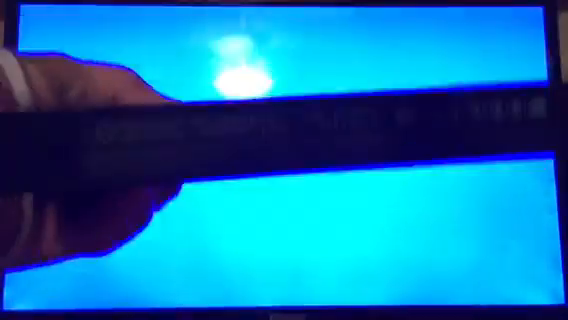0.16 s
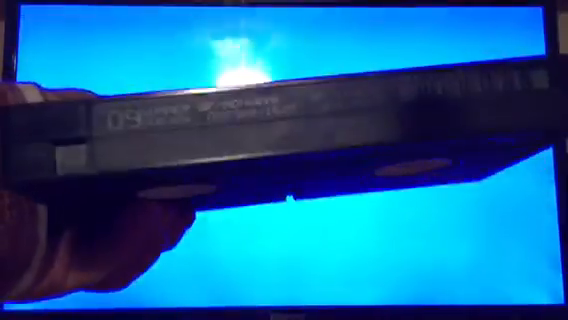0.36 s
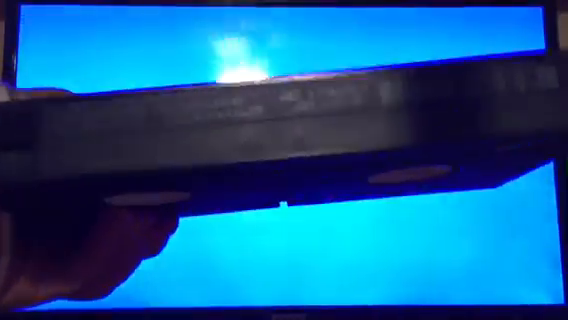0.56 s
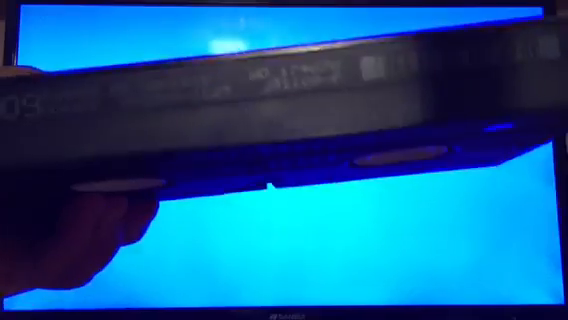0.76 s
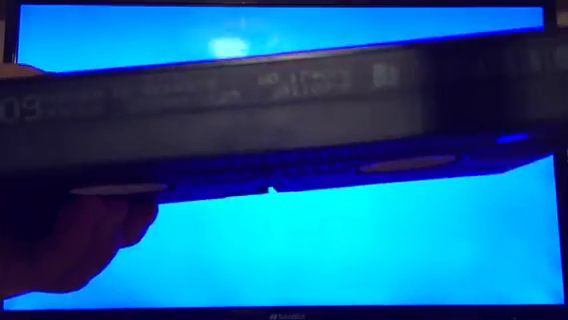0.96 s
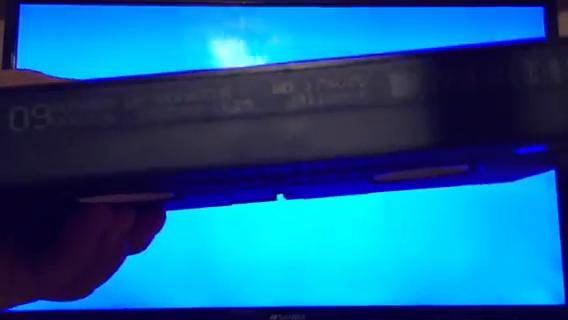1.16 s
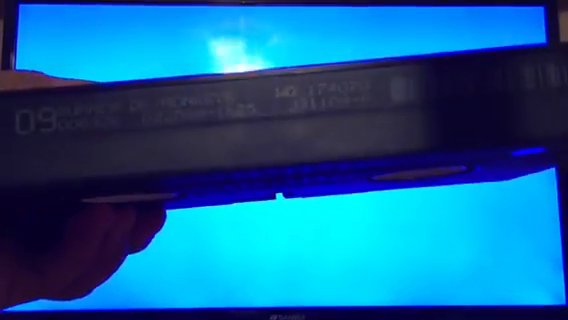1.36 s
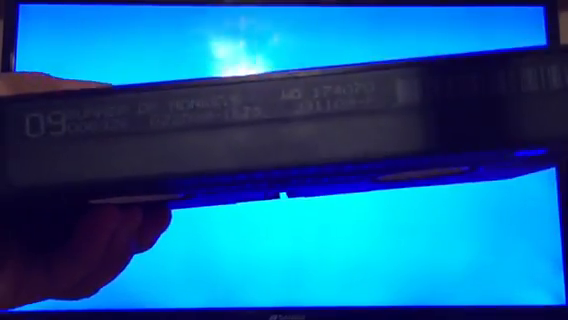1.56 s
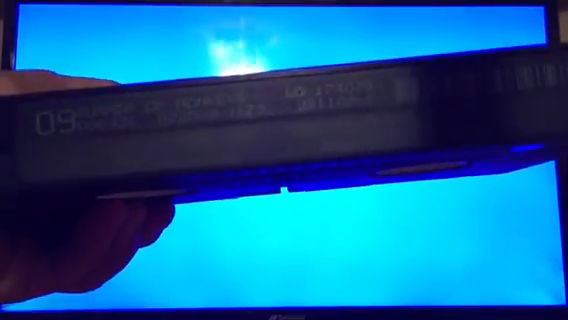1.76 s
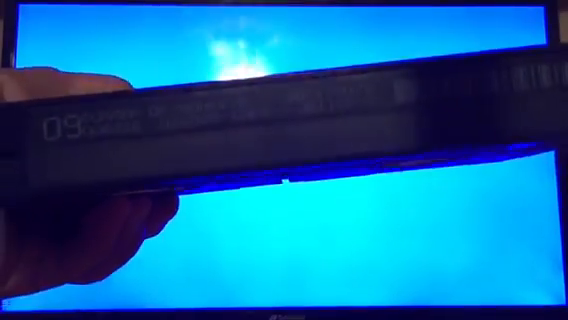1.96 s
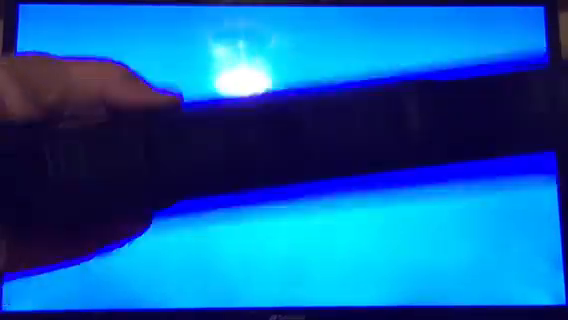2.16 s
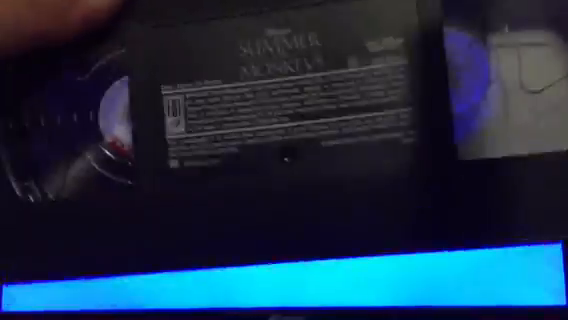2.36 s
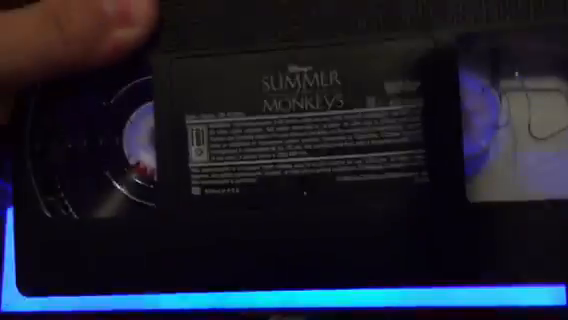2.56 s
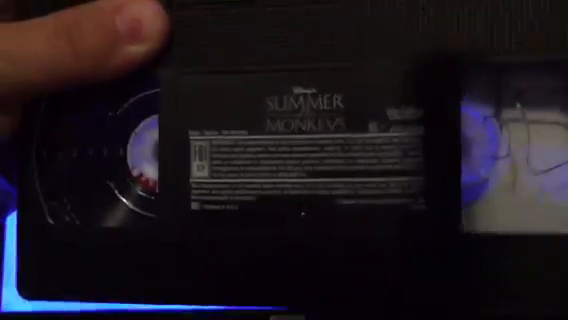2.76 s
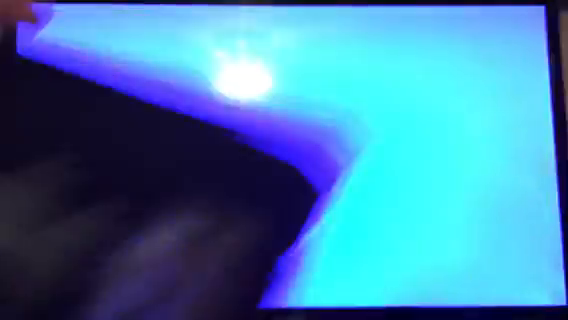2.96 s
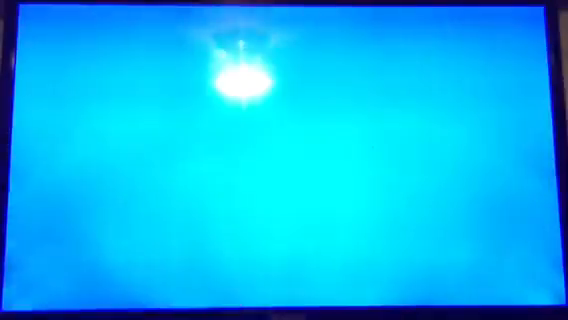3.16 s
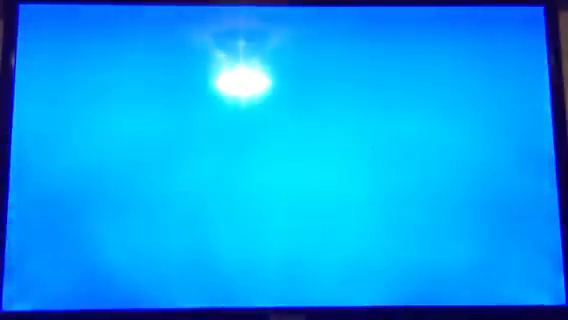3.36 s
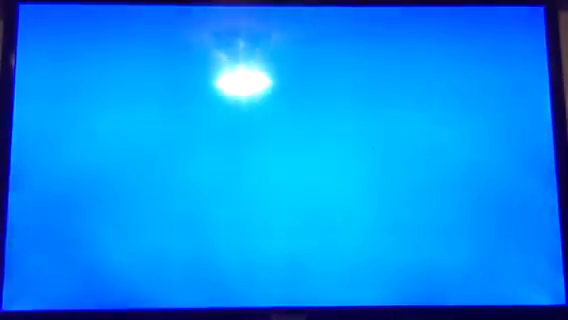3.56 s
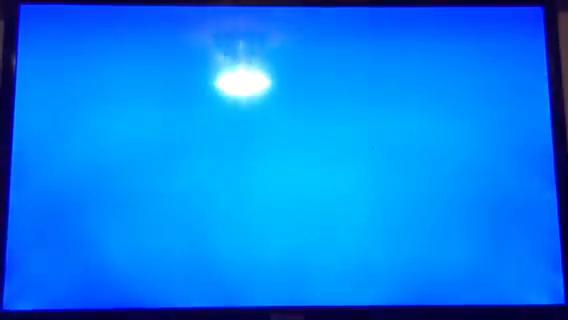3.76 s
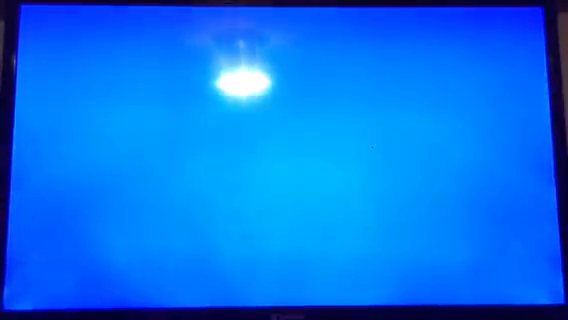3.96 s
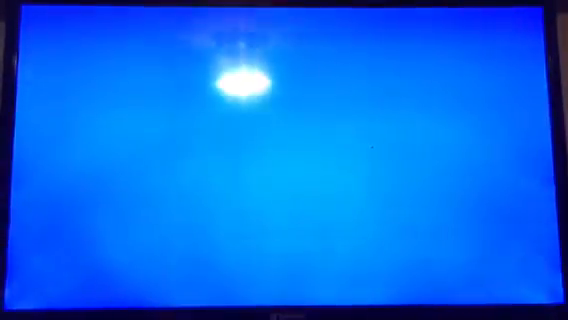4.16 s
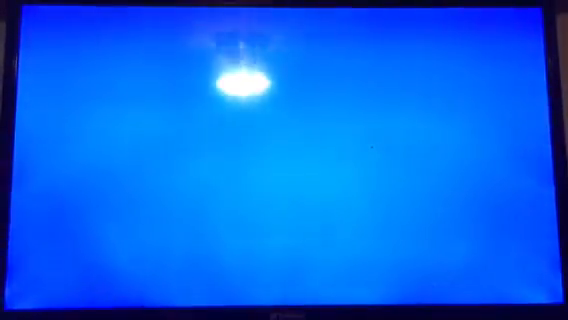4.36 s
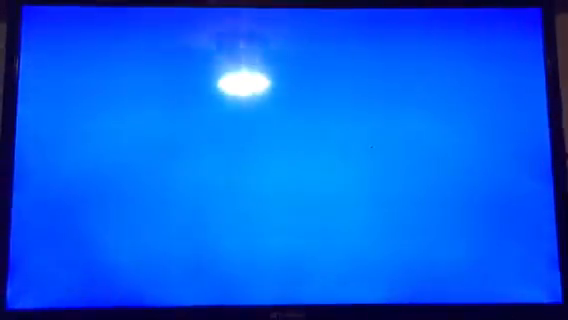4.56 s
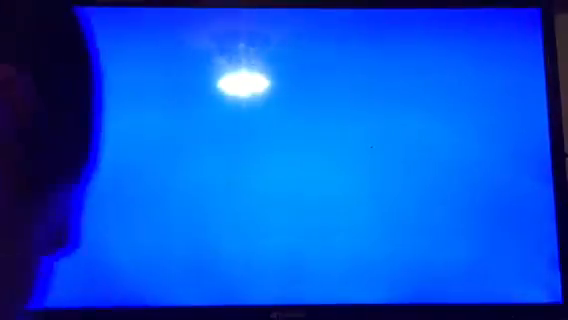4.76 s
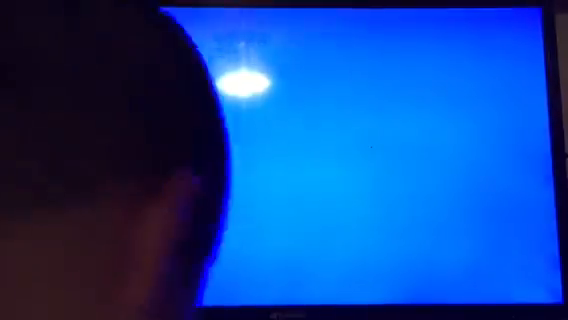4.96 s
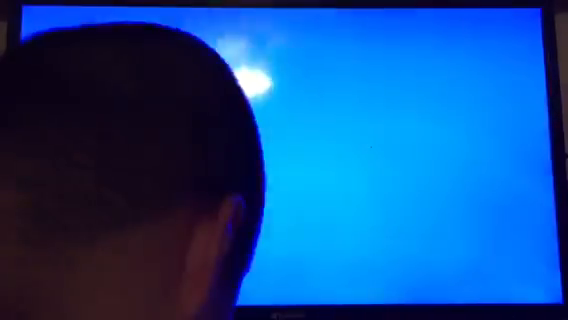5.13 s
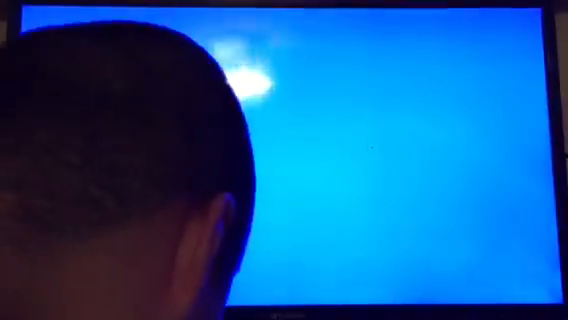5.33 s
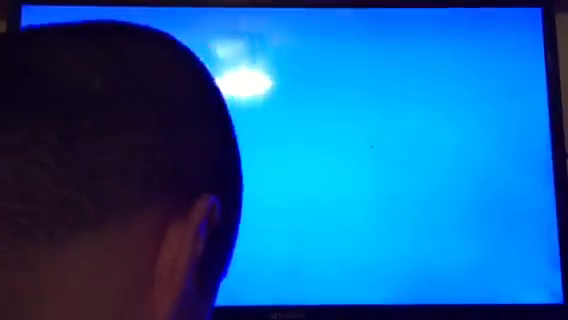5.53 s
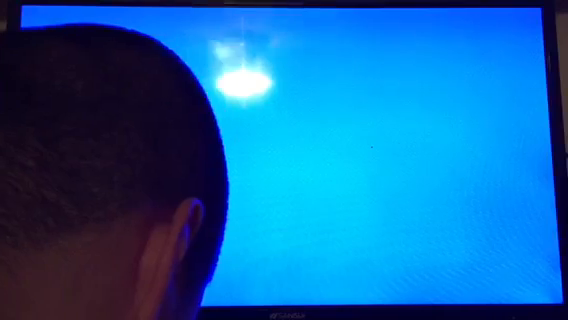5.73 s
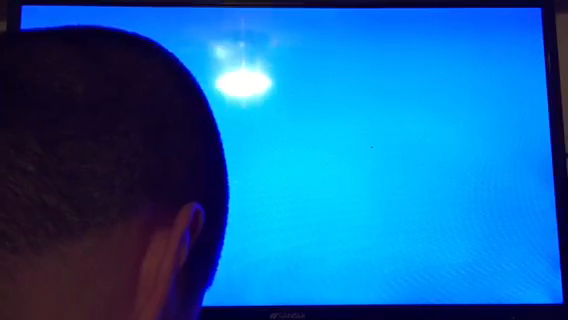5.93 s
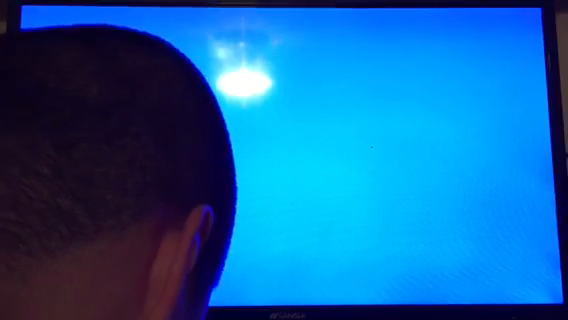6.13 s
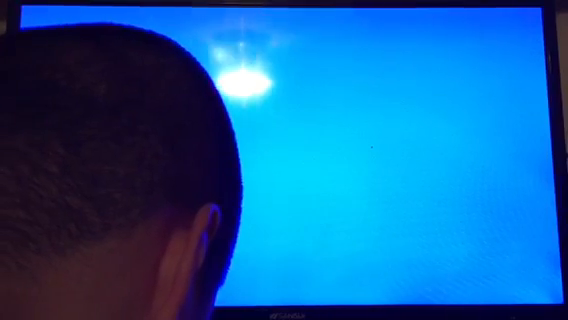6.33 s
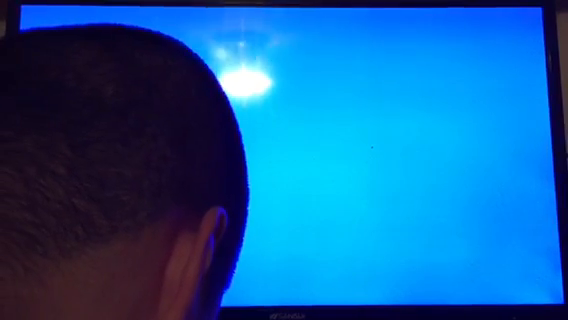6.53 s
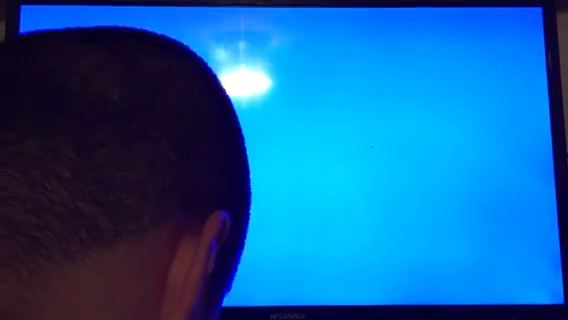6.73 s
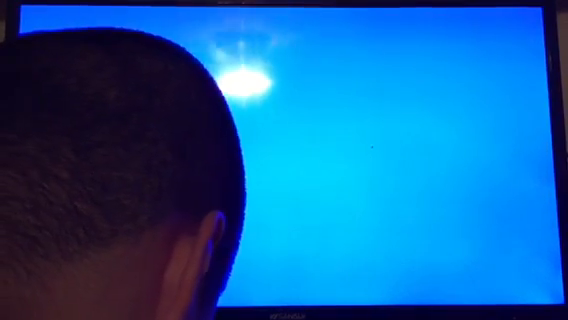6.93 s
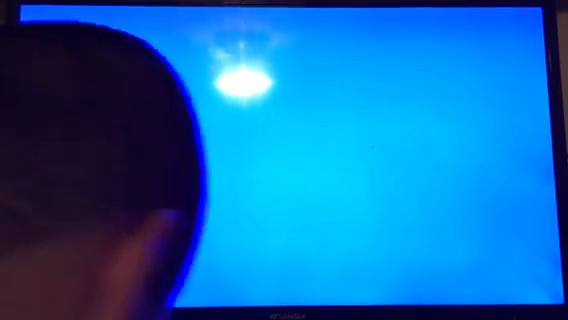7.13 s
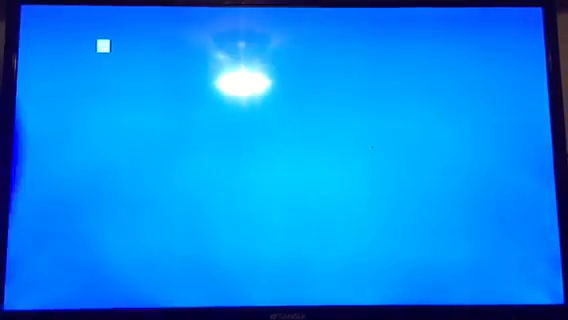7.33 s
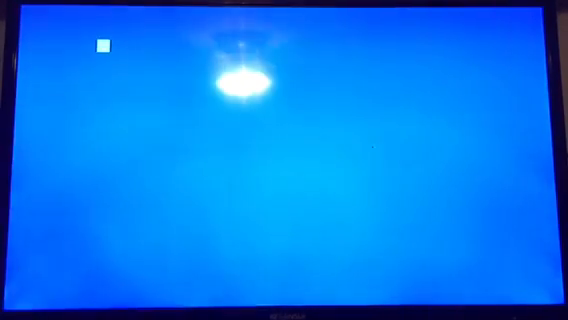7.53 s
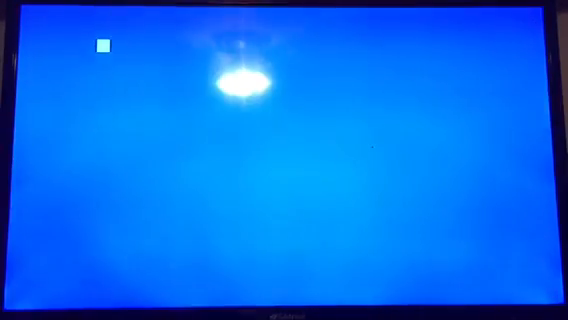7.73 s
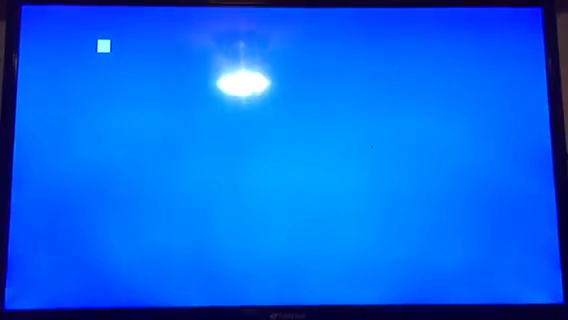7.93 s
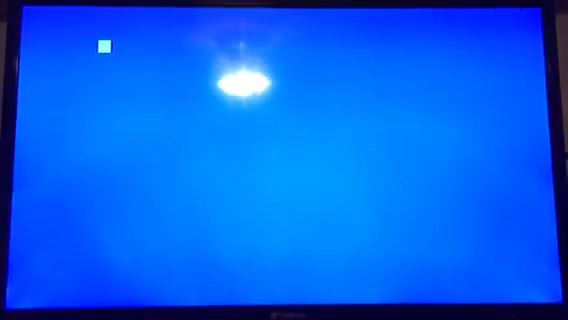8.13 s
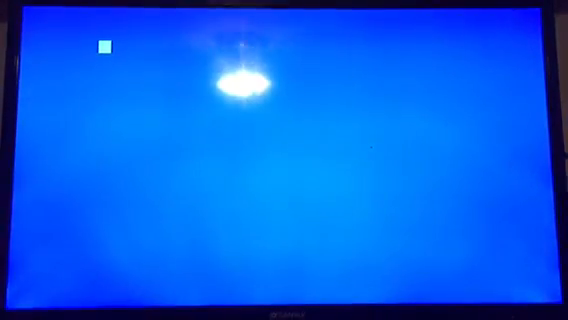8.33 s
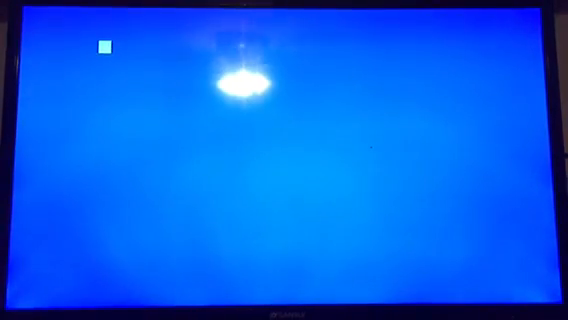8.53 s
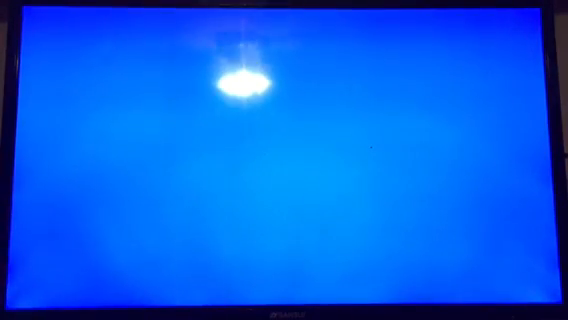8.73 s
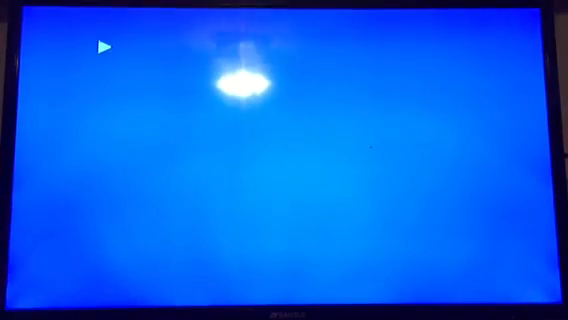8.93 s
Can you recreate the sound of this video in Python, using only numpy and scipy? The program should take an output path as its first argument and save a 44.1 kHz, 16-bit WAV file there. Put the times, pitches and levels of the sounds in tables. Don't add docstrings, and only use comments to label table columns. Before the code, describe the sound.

Close up in a small quiet room, a hollow plastic cassette ticks and rattles faintly in a hand. After a pause come more clicks and one bright, sharp snap. Then it is pushed into a player with dense clunks, scrapes and boomy cabinet knocks. A faint motor whine draws it in, a hard clack follows, and small settling clicks end it over low fan hum.

```python
import sys
import numpy as np
from scipy import signal
from scipy.fft import rfft, irfft, next_fast_len
from scipy.io import wavfile
from scipy.ndimage import map_coordinates

SR = 44100
rng = np.random.default_rng(int(sys.argv[2]) if len(sys.argv) > 2 else 0)


def unload_audio(sound):
    columns = np.transpose(np.atleast_2d(sound))
    steps = np.round(np.clip(columns, -1, 1) * 32767)
    wavfile.write(sys.argv[1], SR, steps.astype(np.int16))


def boost(x):
    u = np.asarray(x, float) / 20
    return 10 ** u


N = 396459

# f/Hz, width/Hz, level/dB
HOLLOW_MODES = [(472, 141, -10.5), (664, 59, -1), (827, 130, -2.5), (1000, 79, -2), (1124, 85, -2),
                (1407, 266, -5)]
# f/Hz, width/Hz, level/dB
CABINET_MODES = [(210, 110, -2.5), (311, 29, 7), (373, 70, -3)]
# f/Hz, width/Hz, level/dB
SHELF_MODES = [(125, 44, -4.5)]
# t/s, hold/s, scrape/dB, hiss/dB, weight on the cabinet/dB
CREEP_STROKES = [
    (2.368, .02, -61, -75, -94),
    (2.422, 0.018, -61, -74, -90),
    (3.588, 0.088, -57, -64, -89),
    (4.165, 0.42, -75, -78, -82),
    (4.666, 0.027, -50.5, -66, -66),
    (4.793, 0.028, -62, -68.5, -86),
]
# t/s, hold/s, scrape/dB, hiss/dB, weight on the cabinet/dB
GUIDE_STROKES = [(4.972, .15, -56.5, -78, -61), (5.2, 0.047, -41, -51, -32.5),
                 (5.253, 0.058, -42, -59, -39.5), (5.33, .075, -51.5, -72, -50.5),
                 (5.436, .02, -35.5, -51.5, -48), (5.52, 0.087, -44, -56, -42),
                 (5.447, 0.023, -36.5, -46, -41), (5.604, 0.064, -40, -56, -47),
                 (5.688, 0.078, -43.5, -55, -38.5), (6.106, 0.06, -44.5, -61, -44.5),
                 (6.19, 0.075, -55, -79, -51), (6.75, 0.19, -67, -81.5, -57.5),
                 (6.914, 0.11, -60, -84, -49), (7.107, .03, -52, -66, -52), (7.141, 0.067, -45, -62, -39.5),
                 (7.3, 0.076, -44.5, -55, -35.5), (7.433, 0.053, -58, -74, -45.5),
                 (7.572, 0.057, -62, -68, -56), (7.715, 0.021, -42.5, -58, -36),
                 (7.75, 0.11, -54.5, -77, -53.5), (7.88, 0.13, -68.5, -81.5, -61.5),
                 (8.284, 0.11, -59, -66.5, -67.5), (8.626, 0.036, -54.5, -82, -53),
                 (8.801, 0.072, -60.5, -59.5, -56.5), (8.904, .07, -60, -74, -78)]


def unit(x):
    return x / np.sqrt(np.mean(x ** 2) + 1e-20)


def along(points, hz):
    f, v = np.transpose(points)
    return np.interp(np.log(hz + 1), np.log(f + 1), v)


def wobble(rate):
    coarse = np.arange(0, N + 16, 16)
    knots = rng.standard_normal(int(N * rate / SR) + 4)
    curve = map_coordinates(knots, [coarse * rate / SR])
    return np.interp(np.arange(N), coarse, curve)


def modes(table, f, detune=1, scatter_db=0):
    centre, width, db = np.transpose(table)[:, None, :, None]
    detune = np.asarray(detune)[..., None]
    centre, width = detune * centre, detune * width
    sign = (-1.) ** np.arange(len(table))[:, None]
    gain = sign * boost(db + np.asarray(scatter_db)[..., None])
    one = gain * 1j * f * width / (centre * centre - f * f + 1j * f * width)
    above = (1 + 1j * f / (1.67 * centre[:, -1])) ** 3
    below = 1j * f / (0.8 * centre[:, 0] + 1j * f)
    return one.sum(axis=1) / above * below


def ringing(x, table):
    m = next_fast_len(N + SR // 2)
    response = modes(table, np.fft.rfftfreq(m, 1 / SR))[0]
    return unit(irfft(rfft(x, m) * response, m)[:N])


def tails(count):
    # f/Hz, t60/s
    room_decay = [(150, 0.27), (700, 0.33), (3000, 0.3), (8000, 0.23), (15000, 0.21)]
    hz, t, z = signal.stft(rng.standard_normal((count, SR // 3)), SR, nperseg=256)
    decay = boost(-60 * t / along(room_decay, hz)[:, None])
    tail = signal.istft(z * decay, SR, nperseg=256)[1]
    tail = np.pad(tail, ((0, 0), (SR // 150, 0)))
    return tail / np.linalg.norm(tail, axis=1, keepdims=True)


def all_round(rows):
    power = np.cumsum(abs(rfft(rows)) ** 2, axis=1)
    bins = np.arange(power.shape[1])
    lo = (.82 * bins).astype(int)
    hi = np.minimum(1.22 * bins + 1, bins[-1]).astype(int)
    return np.sqrt(abs(power[:, hi] - power[:, lo]) / (hi - lo))


def room_noise():
    # f/Hz, density/dB per Hz
    air_spectrum = [(15, -75), (27, -35), (49, -7), (100, -5.5), (152, -3.5), (198, -4.5), (331, -8),
                    (410, -13.5), (970, -10.5), (1570, -15.5), (1850, -14), (2700, -22), (15500, -36)]
    # order of the shaft, level/dB rms
    fan_orders = [(3, -76), (5, -77), (7, -78), (8, -79), (9, -79.5), (21, -86.5), (24, -77.5), (25, -85),
                  (28, -80.5), (32, -77.5), (36, -82.5), (40, -86), (44, -88), (48, -87)]
    # f/Hz, level/dB rms
    hum_tones = [
        (59.3, -70),
        (608, -78),
    ]
    air_db, shaft_hz = -65, 41.57
    m = next_fast_len(N)
    shape = boost(along(air_spectrum, np.fft.rfftfreq(m, 1 / SR)))
    air = irfft(rfft(rng.standard_normal(m)) * shape, m)[:N]
    turn = 2 * np.pi * np.cumsum(shaft_hz * (1 + 0.002 * wobble(4))) / SR
    fan = np.zeros(N)
    for order, db in fan_orders:
        flutter_db = 2.2 * wobble(6)
        phase = rng.uniform(0, 2 * np.pi)
        fan += boost(db + 2.5 + flutter_db) * np.sin(round(order) * turn + phase)
    hum = np.zeros(N)
    for hz, db in hum_tones:
        hum += boost(db) * ringing(rng.standard_normal(N), [(hz, 0.026 * hz + 3, 0)])
    drift_db = .4 * wobble(4)
    return boost(air_db - 0.5 + drift_db) * unit(air) + fan + hum


def whine():
    # t/s, level/dB rms
    whine_levels = [
        (6.55, -98),
        (6.8, -69),
        (7.45, -63.5),
        (7.7, -71),
        (8.1, -76.5),
        (8.4, -80),
        (8.9, -73),
    ]
    whine_hz = 1330
    s, db = np.transpose(whine_levels)
    turn = 2 * np.pi * np.cumsum(whine_hz * (1 + .002 * wobble(7))) / SR
    level_db = np.interp(np.arange(N) / SR, s, db) + 4 * wobble(17)
    return boost(level_db) * np.sin(turn)


def squeak():
    # start/s, end/s, f/Hz, level/dB rms
    roller = (7.42, 7.58, 7740, -77)
    start, end, hz, db = roller
    progress = np.clip((np.arange(N) / SR - start) / (end - start), 0, 1)
    whistle = ringing(rng.standard_normal(N), [(hz, 90, 0)])
    return boost(db) * np.sin(np.pi * progress) * whistle


def pushes():
    # t/s, peak level/dB, f/Hz, t60/s
    furniture = [(0.387, -52, 125.3, 0.33), (0.927, -51, 121, 0.17), (1.377, -50, 125, 0.24),
                 (4.948, -34, 87, 0.041), (5.019, -33.5, 66.3, 0.1), (5.175, -31.5, 150, 0.11),
                 (5.509, -39, 115, .12), (6.421, -51.5, 124, .1), (6.79, -43, 126, 0.16),
                 (7.98, -50, 130, .12), (8.538, -47.5, 123, 0.29), (6.278, -42, 98, 0.18),
                 (7.18, -51, 75, 0.15), (5.609, -25, 145, 0.19), (7.346, -30.5, 135, 0.14),
                 (7.459, -43, 70, 0.13), (7.739, -42, 100, 0.11), (8.209, -47, 61.1, 0.1),
                 (8.281, -45, 48.4, 0.22), (8.349, -42, 45.8, 0.057), (8.819, -47, 54, 0.32),
                 (8.889, -51, 114, 0.096)]
    # t/s, peak level/dB, f/Hz, t60/s
    dull_knocks = [
        (2.987, -39.5, 380, 0.091),
        (3.884, -39.5, 307, .12),
        (3.464, -36, 677, 0.04),
        (3.464, -39, 377, 0.039),
        (5.18, -22, 314, 0.063),
        (6.424, -55, 655, 0.07),
        (6.917, -37.5, 311, 0.089),
        (7.724, -18, 266, 0.057),
        (8.634, -43, 188.5, 0.083),
        (8.792, -36, 231, 0.21),
    ]
    # t/s, peak level/dB, f/Hz, t60/s
    small_parts = [(0.2044, -44, 5300, 0.02), (0.2553, -39, 5600, 0.016), (0.9965, -49, 5200, 0.01),
                   (2.372, -43, 7100, 0.022), (3.0929, -51, 5770, 0.025), (3.25, -46.5, 5830, 0.03),
                   (3.8036, -52, 5450, 0.02), (8.4779, -35, 6750, 0.018), (8.479, -37, 9030, 0.014),
                   (8.479, -57, 14000, 0.014), (8.63, -40, 4500, 0.02), (8.739, -43.5, 4340, 0.022)]
    # t/s, peak level/dB, f/Hz, t60/s
    flaps = [
        (.203, -45, 785, 0.065),
        (.243, -42, 790, 0.094),
        (0.9973, -44.5, 2600, 0.014),
        (3.465, -25.5, 2120, 0.02),
        (3.884, -19, 2390, 0.025),
        (3.648, -48, 746, .2),
        (4.975, -41, 599, 0.25),
        (5.249, -24.5, 1117, 0.075),
        (5.271, -23, 1068, 0.09),
    ]
    # t/s, peak level/dB, f/Hz, t60/s
    panel_booms = [(5.1923, -18.5, 309.3, 0.16), (5.286, -41, 286, 0.099), (5.33, -34, 260, .07),
                   (5.469, -26.5, 290, 0.11), (5.488, -28.5, 185, 0.094), (5.521, -36, 194, 0.072),
                   (5.617, -22.5, 302, 0.097), (5.664, -24.5, 312, 0.14), (5.709, -30, 222, 0.055),
                   (5.733, -29, 315, 0.094), (5.766, -30, 290, 0.083), (5.81, -34.5, 338, 0.08),
                   (6.174, -28.5, 274, .08), (6.203, -33.5, 324, 0.074), (6.245, -36, 290, 0.12),
                   (6.316, -47, 321, 0.19), (6.92, -32, 315, 0.088), (6.944, -36, 355, 0.069),
                   (6.972, -36, 345, .1), (7.055, -38, 301, 0.12), (7.156, -34, 237, 0.14),
                   (7.275, -30, 310, 0.1), (7.342, -30.5, 304, .1), (7.377, -34, 290, 0.077),
                   (7.431, -33, 232.4, .15), (7.698, -26.5, 293, 0.065), (7.751, -32.5, 280, 0.055),
                   (7.834, -38, 304, 0.076), (8.659, -39, 268, 0.052)]
    # t/s, peak level/dB, f/Hz, t60/s
    wall_catches = [(0.244, -31.5, 2750, 0.06), (.272, -50, 1000, 0.13), (3.586, -47.5, 750, .08),
                    (3.698, -48, 2520, 0.053), (2.989, -45, 980, 0.054), (3.369, -44, 1755, .03),
                    (3.655, -38, 2065, .04), (3.67, -45, 2070, .04), (3.894, -35.5, 1850, 0.055),
                    (4.658, -40.5, 650, .06), (4.667, -39, 1860, 0.043), (4.97, -36.5, 1790, .05),
                    (4.987, -33.5, 571, 0.065), (5.177, -20.5, 646, .05), (5.183, -37, 1150, 0.053),
                    (5.282, -23, 720, 0.078), (5.291, -20.5, 1055, 0.048), (5.42, -33, 2272, .04),
                    (5.453, -26, 1073, 0.081), (5.47, -29, 1820, .04), (5.525, -32.5, 1421, .04),
                    (5.535, -36, 705, .05), (5.596, -27, 700, .04), (5.597, -31, 1290, 0.029),
                    (5.606, -25, 650, 0.077), (5.705, -26, 1640, 0.035), (6.175, -31.5, 660, 0.077),
                    (6.187, -38, 1150, .05), (6.25, -33, 1130, 0.039), (6.32, -45, 1195, 0.055),
                    (6.913, -38.5, 1507, 0.065), (6.934, -37, 670, 0.065), (7.12, -39, 794, .08),
                    (7.149, -30.5, 1465, 0.045), (7.334, -30, 800, .04), (7.344, -27.5, 966, 0.046),
                    (7.163, -31.5, 2760, 0.095), (7.413, -39, 1780, .04), (7.725, -19, 860, 0.031),
                    (7.727, -21.5, 596, 0.026), (7.742, -26, 2050, 0.025), (7.879, -43, 1210, .04),
                    (8.738, -38.5, 1950, 0.038), (8.628, -46, 1920, 0.064), (8.3, -50, 2260, .08)]
    # t/s, peak level/dB, f/Hz
    edge_snaps = [(2.9688, -35.5, 3140), (2.974, -44, 2821), (3.124, -45, 2500), (3.143, -43, 3273),
                  (3.229, -46, 3930), (3.232, -44, 3090), (3.255, -42, 4030), (3.37, -39, 3714),
                  (3.5835, -39, 3144), (3.645, -36, 3898), (3.672, -40, 3219), (3.8831, -10.5, 5700),
                  (3.888, -13, 3400), (4.664, -32, 3250), (4.809, -42, 3700), (5.084, -47, 2961),
                  (5.095, -44, 2810), (5.177, -26, 4500), (5.183, -18, 3575), (5.283, -23, 4500),
                  (5.288, -28, 2900), (5.294, -38, 3079), (5.452, -18, 6550), (5.598, -20, 4300),
                  (5.602, -18, 3000), (5.705, -30, 4500), (5.754, -31, 2950), (5.76, -32.5, 2750),
                  (6.097, -41, 3004), (6.127, -38, 2950), (6.159, -32, 3531), (6.174, -35, 4500),
                  (6.178, -27, 2853), (6.193, -42, 2799), (6.247, -40, 4285), (6.271, -39, 3079),
                  (7.107, -42.5, 3704), (7.24, -44, 2853), (7.595, -45, 4404), (7.6845, -27, 4400),
                  (7.728, -13, 2560), (7.738, -31, 3133), (8.484, -39, 3047), (8.637, -35, 3270),
                  (8.678, -38, 3700)]
    snap_cycles = 11
    events = furniture + dull_knocks + small_parts + flaps + panel_booms + wall_catches
    events = events + [(s, db, hz, snap_cycles / hz) for s, db, hz in edge_snaps]
    sound, wet = np.zeros((2, N + SR))
    for s, db, hz, t60 in events:
        t = np.arange(int(np.clip(t60, .002, .5) * SR)) / SR
        onset = 1 - np.exp(-(t / (0.00046 + 0.71 / hz)) ** 2)
        bob = onset * boost(-60 * t / max(t60, .002)) * np.sin(2 * np.pi * hz * t)
        bob *= boost(db - 4.5) / abs(bob).max()
        beamed = min(1, snap_cycles / (hz * t60)) ** .5
        first = round(s * SR)
        sound[first:][:len(t)] += bob
        wet[first:][:len(t)] += bob * beamed
    return sound[:N] + boost(-10.5) * signal.fftconvolve(wet[:N], tails(count=1)[0])[:N]


def strokes(level_db, fall_db_per_s):
    grip_db_per_s = 448
    t, power = np.arange(0, N + 64, 64) / SR, 0
    for (s, hold, *_), db in zip(CREEP_STROKES + GUIDE_STROKES, level_db):
        rise_db = grip_db_per_s * np.maximum(s - t, 0)
        fall_db = fall_db_per_s * np.maximum(t - s - hold, 0)
        power = power + boost(db - rise_db - fall_db) ** 2
    return np.interp(np.arange(N) / SR, t, np.sqrt(power))


def slide():
    # f/Hz, width/Hz, level/dB
    rubbed_walls = [(1800, 240, 3.5), (2234, 220, 5), (2650, 390, 1), (3400, 700, -4.5), (4300, 1200, -7.5)]
    # f/Hz, width/Hz, level/dB
    hiss_modes = [(3640, 1400, -1), (5400, 3100, 0), (11100, 7000, -6.5)]
    lift, settle, sway = 300.5, 293, 138.5
    shelf_db, shelf_follows = -21.5, 0.66
    scrape_db, hiss_db, weight_db = np.transpose(CREEP_STROKES + GUIDE_STROKES)[2:]
    clumps = 2.2 * wobble(60) + 2.2 * wobble(220)

    def grains(lumpy):
        return rng.standard_normal(N) * boost(lumpy * clumps + 1.3 * rng.exponential(size=N))

    def jolts():
        return rng.standard_normal(N) * boost(3 * wobble(35))

    hollow_db = scrape_db - 2.5 + 0.19 * np.minimum(weight_db - scrape_db, 0)
    rub = strokes(scrape_db - 4.5, lift) * ringing(grains(0.97), rubbed_walls)
    rub += strokes(hollow_db, lift) * ringing(grains(1), HOLLOW_MODES)
    rub += strokes(hiss_db - 0.5, lift) * ringing(grains(.7), hiss_modes)
    box = strokes(weight_db - 4.0, settle) * ringing(jolts(), CABINET_MODES)
    board = strokes(shelf_db + shelf_follows * weight_db, sway) * ringing(jolts(), SHELF_MODES)
    near = rub + box + board
    return near + boost(-7) * signal.fftconvolve(near, tails(count=1)[0])[:N]


def knocks(s, db, parts_db, spot_hz, t60, spot_db, rise_s, crack, room_db):
    # f/Hz, width/Hz, level/dB
    shell_modes = [(1800, 240, 2.5), (2280, 490, 4), (2720, 460, 1.5), (3364, 680, -2.5), (4234, 780, -4.5)]
    # f/Hz, width/Hz, level/dB
    edge_modes = [(4420, 900, -8), (5610, 1900, -3), (6860, 870, -1)]
    # f/Hz, width/Hz, level/dB
    spark_modes = [(8790, 530, -4.5), (12200, 3100, -13.5), (15000, 2600, -12.5)]
    size, roomy = 2 ** 12, 2 ** 14
    t, f = np.arange(size) / SR, np.fft.rfftfreq(size, 1 / SR)
    fade = boost(-60 * t / np.clip(t60, .006, .2)) + crack * boost(-60 * t / 0.0014)
    contacts = rng.standard_normal((len(s), size)) * boost(2.0 * rng.exponential(size=(len(s), size)))
    force = rfft((1 - np.exp(-t / rise_s)) * fade * contacts)

    def peak(response):
        part = irfft(force * response)
        return part / abs(part).max(axis=1, keepdims=True)

    out = boost(spot_db) * peak(modes([(0.99, 0.023, 0)], f, spot_hz))
    bodies = (shell_modes, edge_modes, spark_modes, HOLLOW_MODES, SHELF_MODES + CABINET_MODES)
    for table, part_db in zip(bodies, parts_db):
        chance = rng.standard_normal((len(s), 2, len(table)))
        out += boost(part_db) * peak(modes(table, f, np.exp(0.034 * chance[:, 0]), 3 * chance[:, 1]))
    out *= boost(db)
    out = np.pad(out, ((0, 0), (0, roomy - size)))
    out += boost(room_db) * irfft(all_round(out) * rfft(tails(count=len(s)), roomy))
    sound = np.zeros(N + roomy)
    for start, row in zip(np.round(s[:, 0] * SR).astype(int), out):
        sound[start:start + roomy] += row
    return sound[:N]


def player():
    # t/s, peak level/dB, hardness/dB, hollow/dB, favoured f/Hz
    slot_knocks = [(4.969, -41.5, -14, 10.5, 1780), (5.058, -45.5, -11.5, -7, 2050),
                   (5.087, -39, -9, 2.5, 2050), (5.171, -19, -6.5, 1, 948), (5.178, -20.5, -4.5, -15, 1160),
                   (5.251, -37, -6, 0, 2300), (5.268, -28, -6.5, 7, 2380), (5.282, -23, -10, 2, 2920),
                   (5.419, -26.5, -13, -10, 2400), (5.45, -19.5, -3, -10, 2180),
                   (5.577, -32.5, -8, 9.5, 756), (5.595, -19.5, -6, 3.5, 1323), (5.672, -35, -9, 2, 1500),
                   (5.705, -29, -5, 6, 2900), (5.751, -33, -14, 6.5, 1680), (6.076, -47.5, -1, 7, 835),
                   (6.121, -37.5, -11.5, 4, 1280), (6.143, -35.5, -7.5, -1, 2120),
                   (6.173, -33.5, -5.5, 7.5, 1136), (6.238, -33.5, -6, 7, 1210), (6.31, -57, -3, 10, 1200)]
    # t/s, peak level/dB, hardness/dB, hollow/dB, favoured f/Hz
    tray_knocks = [(6.73, -53, -23, 7, 2180), (6.912, -42, -5, 7, 1580), (7.094, -53, -3, 15, 1460),
                   (7.107, -41.5, -12, 5, 1280), (7.149, -24.5, -6, -23, 3170),
                   (7.206, -35, -17, -13, 2120), (7.232, -43, -14, -14, 2350), (7.3, -37, 1, 7, 803),
                   (7.329, -26.5, -4, -3, 2310), (7.382, -42, -11, 0, 735), (7.595, -48.5, -7, -14, 1810),
                   (7.682, -26, -3, -4.5, 1464), (7.724, -18.5, -13, 0, 860), (7.763, -44, -18, -12, 2700),
                   (8.257, -52, -9, -7, 2680), (8.299, -53, -15, -13, 2200), (8.396, -49, -9, -14, 1310),
                   (8.465, -43, -10, -11, 1360), (8.477, -40, -3.5, 3.5, 1510),
                   (8.622, -42.5, -10, -17, 1860), (8.63, -36, -12.5, -9, 1600),
                   (8.675, -46.5, -16, -16, 4000), (8.736, -41.5, -14.5, -22, 1970),
                   (8.791, -50.5, -15, 19.5, 744)]
    s, db, tick_db, hollow_db, spot_hz = np.transpose(slot_knocks + tray_knocks)[..., None]
    cabinet_db = -11 + 0.34 * hollow_db
    parts_db = (-3, tick_db - 2.0, 1.32 * tick_db - 3, hollow_db - 7.5, cabinet_db)
    return knocks(s, db, parts_db, spot_hz, t60=0.064, spot_db=-10, rise_s=0.001, crack=0.34, room_db=-3.0)


def hand():
    # t/s, peak level/dB, hardness/dB, hollow/dB, favoured f/Hz
    reel_knocks = [(0.03, -54.5, -19, -4, 1800), (0.141, -38, -8, -10.5, 3250),
                   (0.2, -32.5, -13.5, -14, 2480), (0.2422, -28.5, -20.5, -15, 3030),
                   (0.56, -54.5, -12, 0, 2050), (0.995, -50, -12, -4, 1000), (2.371, -40.5, -5, -8, 1920),
                   (2.382, -36.5, -16, -7, 2700), (2.426, -24.5, -22, -14, 2520),
                   (2.443, -41, -17, -7, 2280), (2.482, -29.5, -13.5, -16, 2420),
                   (2.491, -31, -13, -10, 2230)]
    # t/s, peak level/dB, hardness/dB, hollow/dB, favoured f/Hz
    grip_knocks = [(2.956, -47, -12, 0, 2050), (2.965, -32, -23, -10, 2500), (2.987, -35.5, -23, 0.5, 2000),
                   (3.092, -47.5, -10, -0.5, 2000), (3.132, -36.5, -26, -11.5, 2480),
                   (3.181, -51, -3, -8, 2600), (3.22, -39, -20, -13, 3780), (3.251, -45, -12, -9, 6060),
                   (3.363, -36.5, -25, -16, 2270), (3.463, -29, -12.5, -2, 2900),
                   (3.553, -51.5, -6.5, -11, 3700), (3.582, -45, 0, -7.5, 2100),
                   (3.644, -35, -11.5, -24.5, 2130), (3.657, -34.5, -8.5, -27.5, 2150),
                   (3.68, -40.5, -12.5, -8.5, 2300), (3.802, -42, -4, -5.5, 870),
                   (3.87, -35.5, -16.5, -7.5, 2500), (3.883, -15, 1.5, -5.5, 6050),
                   (4.18, -52, -10, -9, 3000), (4.657, -29.5, -14, -12.5, 3250),
                   (4.793, -43, -7, -21, 2600), (4.835, -46.5, -23, -24, 2370)]
    s, db, tick_db, hollow_db, spot_hz = np.transpose(reel_knocks + grip_knocks)[..., None]
    t60 = .029 - .0011 * tick_db
    spark_db = 0.9 * tick_db - 6.5
    parts_db = (-5, tick_db - 2.0, spark_db, hollow_db - 2.5, 2.0 * hollow_db - 15.5)
    return knocks(s, db, parts_db, spot_hz, t60, spot_db=-10, rise_s=0.025 * t60, crack=1.3, room_db=-8.5)


def scene():
    background = room_noise() + whine() + squeak()
    return (background + pushes() + slide() + player() + hand())[None]


def band_limit(x):
    return signal.sosfilt(signal.butter(12, 16520, fs=SR, output="sos"), x)


def record(dry):
    # f/Hz, width/Hz, level/dB
    port_dips = [
        (4930, 240, -3),
        (7180, 420, -1),
        (10480, 260, -4.5),
    ]
    top_hz = 15850
    m = next_fast_len(N)
    hz = np.fft.rfftfreq(m, 1 / SR)
    port_db = sum(db * np.exp(-((hz - c) / w) ** 2) for c, w, db in port_dips)
    limit_db = -45 / (1 + np.exp((top_hz - hz) / 70))
    low_cut = 1 / (1 + (30 / (hz + 1)) ** 2)
    mix = irfft(rfft(dry, m) * boost(port_db + limit_db) * low_cut, m)[:, :N]
    return band_limit(mix)


dry = scene()
out = record(dry)
unload_audio(out)
```